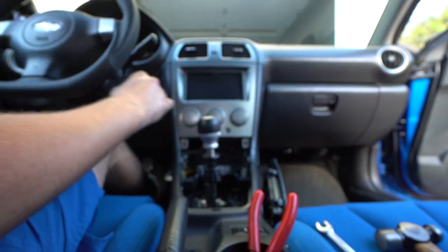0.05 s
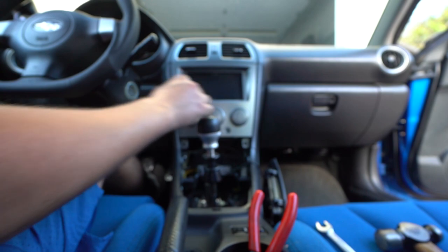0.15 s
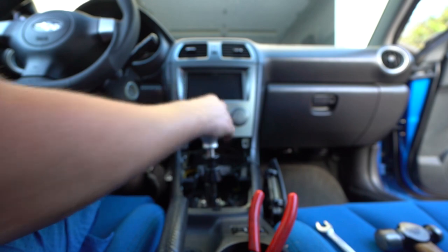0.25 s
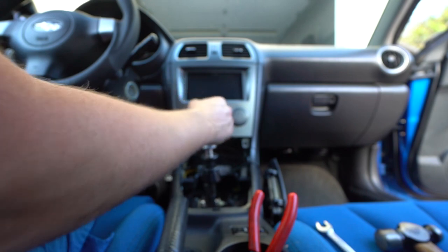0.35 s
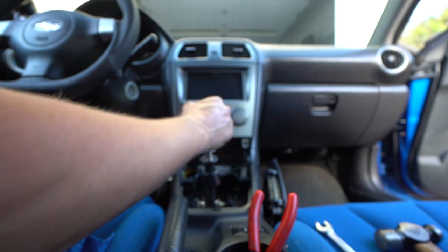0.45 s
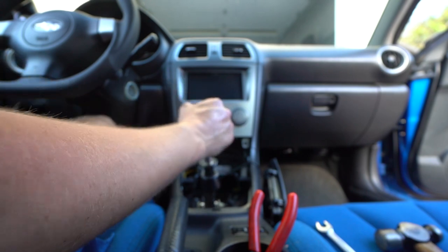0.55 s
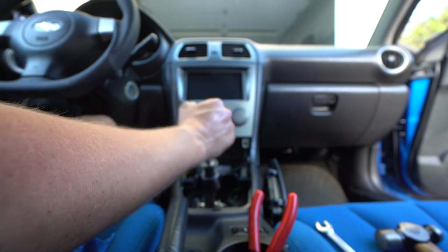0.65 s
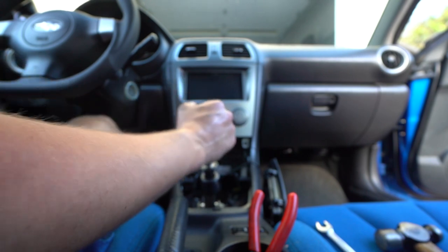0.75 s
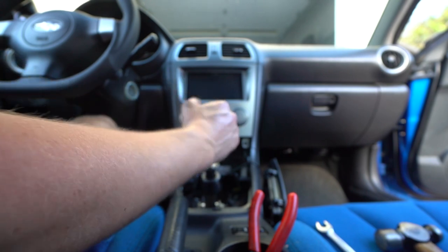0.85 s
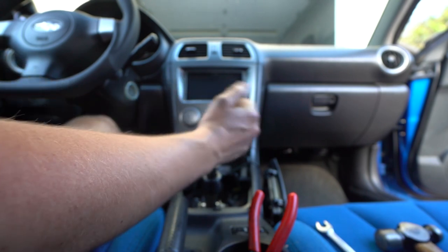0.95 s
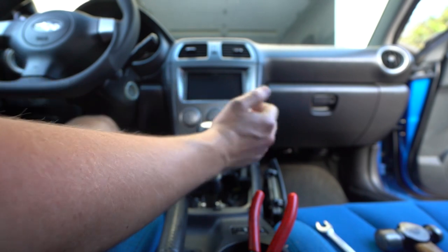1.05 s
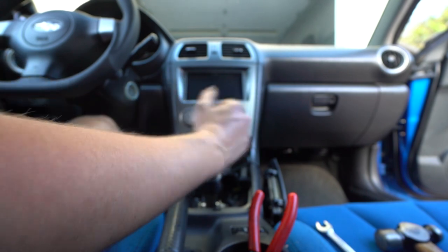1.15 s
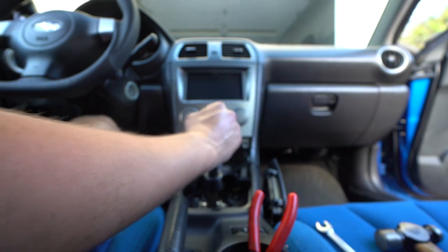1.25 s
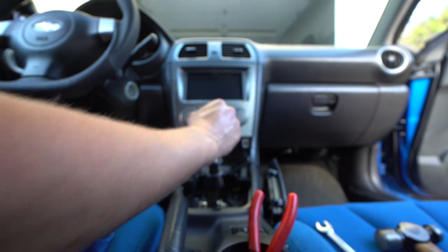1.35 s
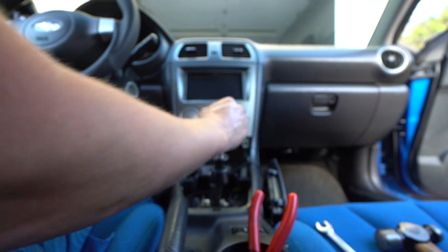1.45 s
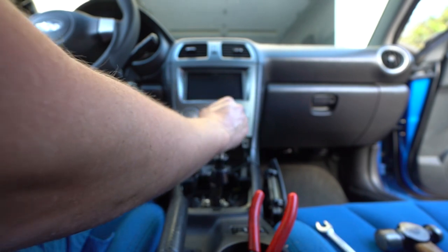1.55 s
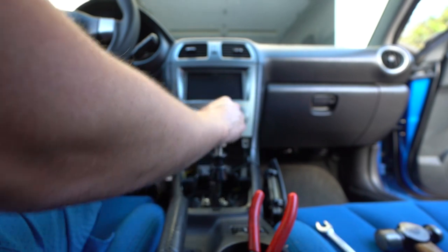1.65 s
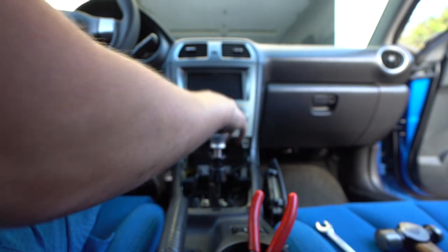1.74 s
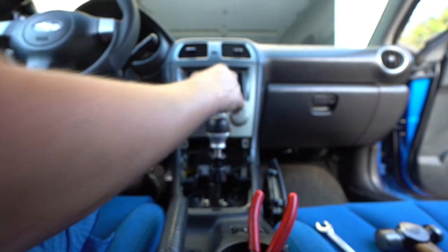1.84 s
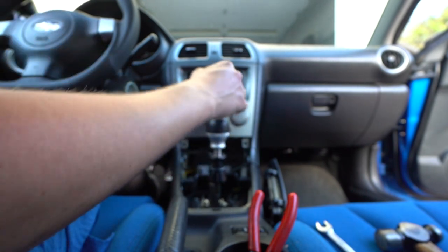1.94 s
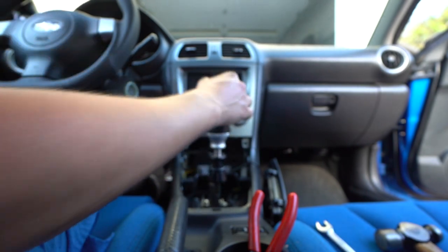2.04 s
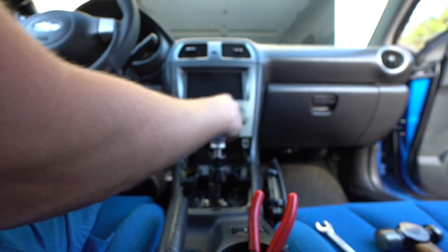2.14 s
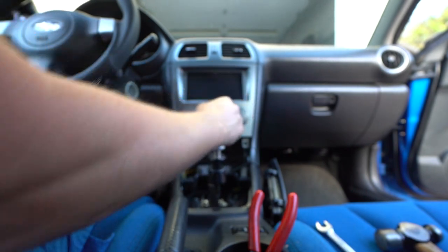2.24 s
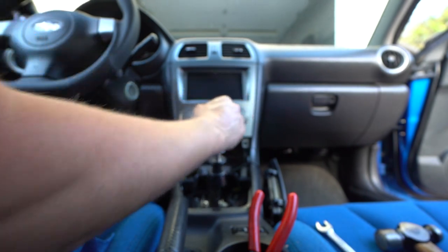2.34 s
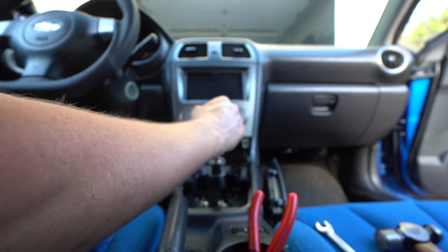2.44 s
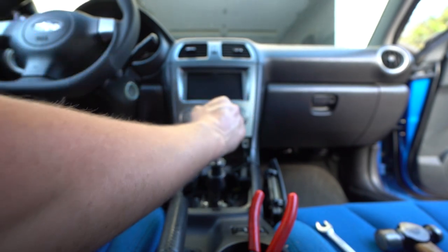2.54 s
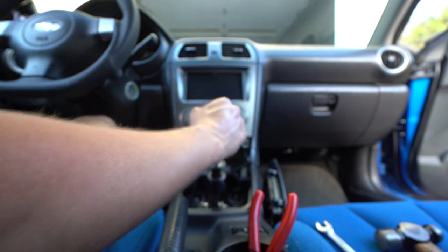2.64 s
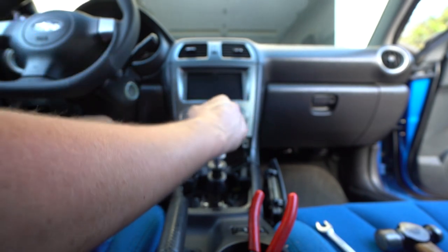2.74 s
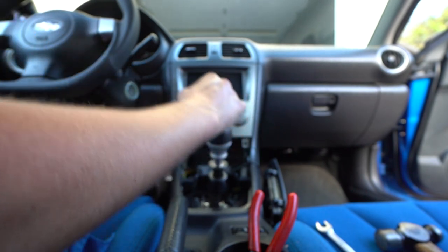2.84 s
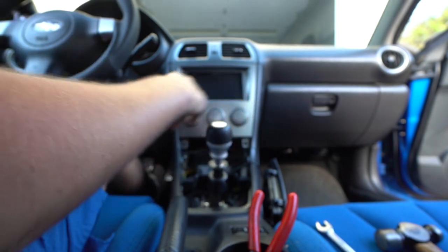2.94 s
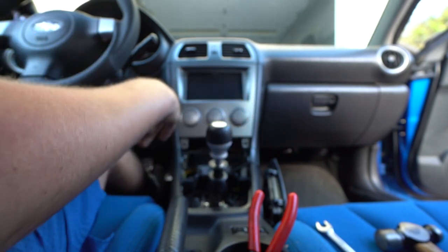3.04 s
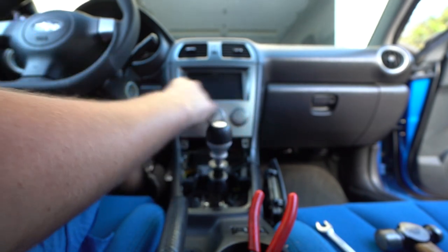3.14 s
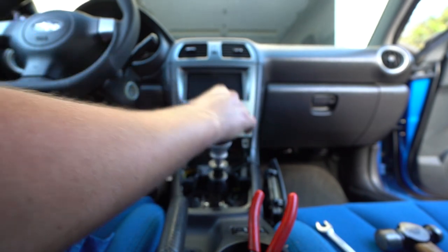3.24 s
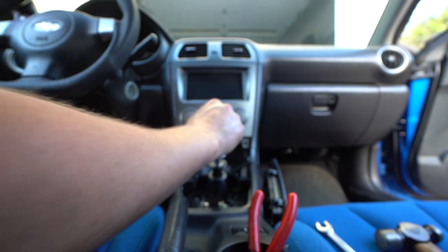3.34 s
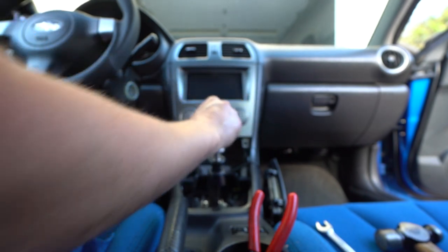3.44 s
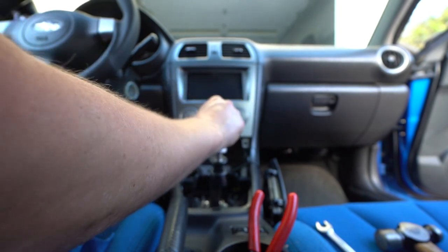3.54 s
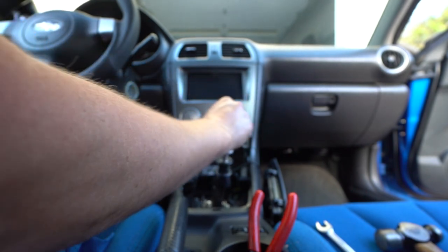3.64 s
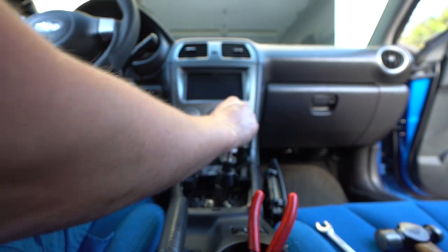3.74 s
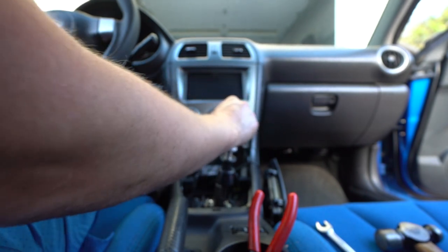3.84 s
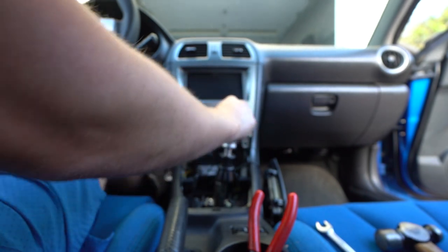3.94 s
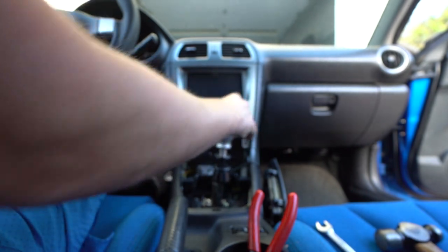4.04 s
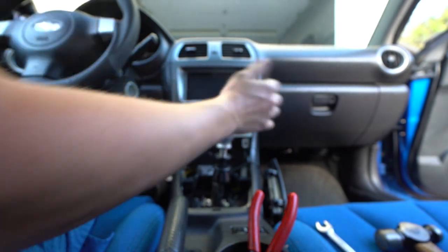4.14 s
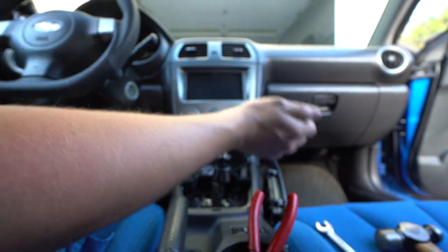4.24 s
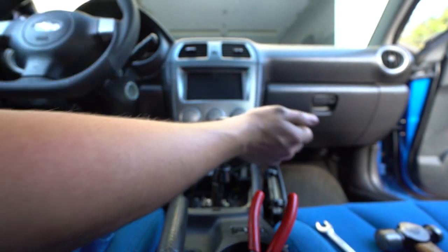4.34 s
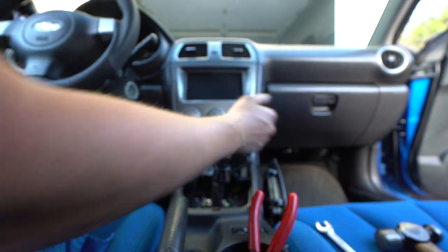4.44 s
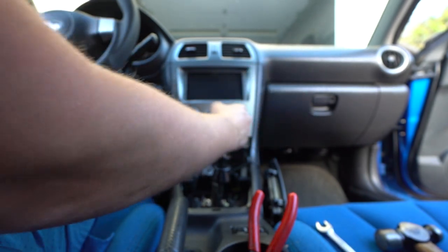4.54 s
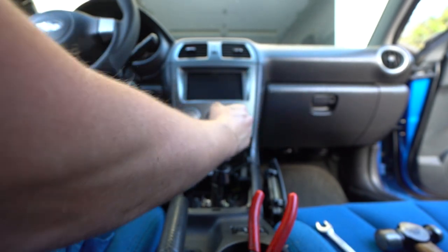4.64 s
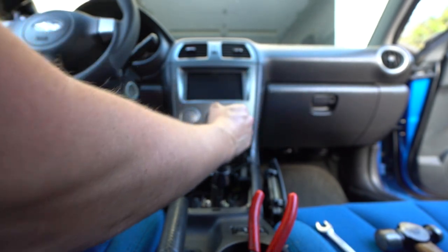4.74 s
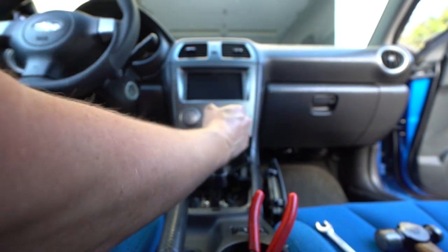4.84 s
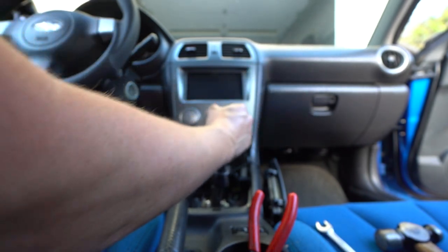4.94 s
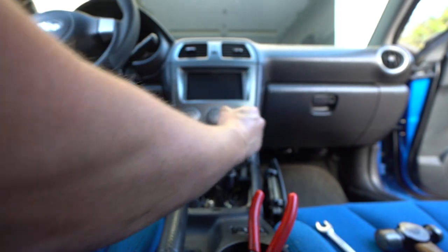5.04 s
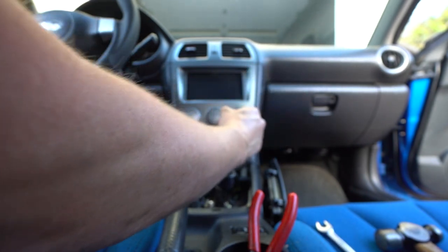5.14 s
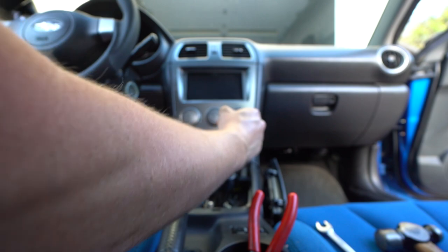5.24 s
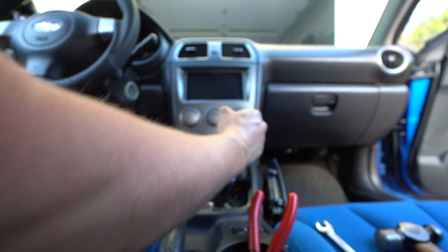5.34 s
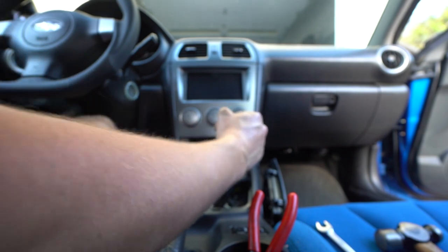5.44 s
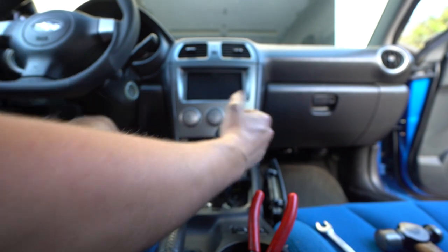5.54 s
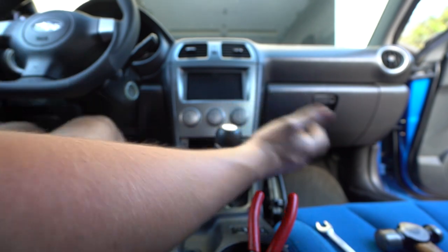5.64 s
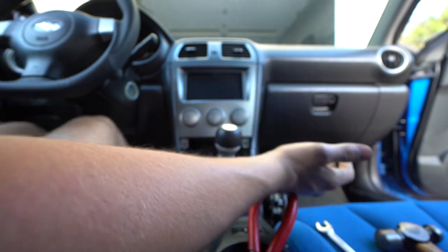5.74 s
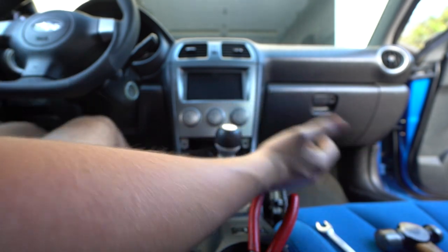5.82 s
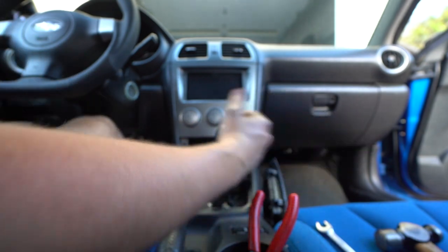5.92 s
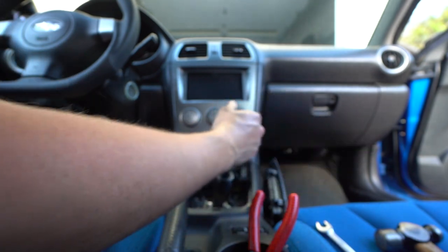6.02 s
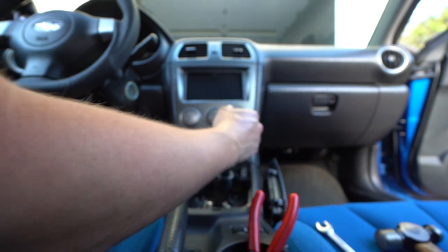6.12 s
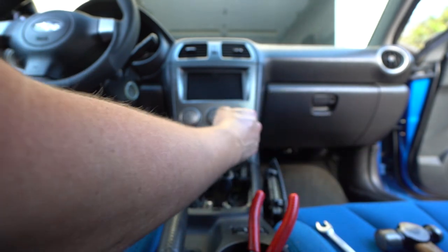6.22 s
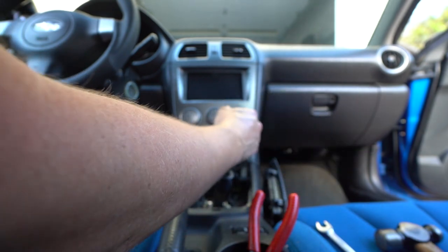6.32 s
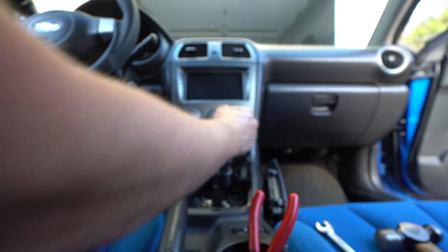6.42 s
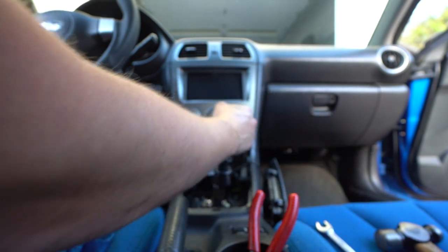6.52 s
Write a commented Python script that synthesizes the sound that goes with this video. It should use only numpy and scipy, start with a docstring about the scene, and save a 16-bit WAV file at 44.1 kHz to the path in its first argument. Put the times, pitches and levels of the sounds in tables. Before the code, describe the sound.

A gear shifter is worked back and forth for several seconds, heard from between the seats in a dry, tight cabin. Quick double clunks of the linkage alternate with short pauses; some are dull and woody, others bright and clanky. Skin rubs softly on the knob, the palm cracks against it, and little rattles trail the harder shifts over low body rumble and a quiet hush.

```python
"""A bare gear lever is worked through its gates in a parked car, engine off, heard from between the seats.
It knocks over its detent and the linkage clunks home: damped sines and banded chatter noise.
Steel parts ring in clusters of close modes; the palm slaps and rubs the knob as shaped noise.
Clunks boom in the cabin, throws rock the body and a small loose part taps, over a faint hush and hum."""
import sys
import numpy as np
from scipy import signal
from scipy.fft import rfft, irfft
from scipy.io import wavfile
from scipy.ndimage import uniform_filter1d

SR = 44100
rng = np.random.default_rng(int(sys.argv[2]) if len(sys.argv) > 2 else 0)


def pcm_store(signal):
    """Save signal as 16-bit PCM."""
    levels = np.round(np.clip(np.atleast_2d(signal), -1, 1) * 32767)
    wavfile.write(sys.argv[1], SR, levels.astype(np.int16).T)


N = 290178
TIME = np.arange(N) / SR


def from_db(db):
    """Decibels to amplitude gain."""
    return 10 ** (np.asarray(db) / 20)


def rms_one(x):
    """Scale to unit rms."""
    return x / np.sqrt(np.mean(x ** 2) + 1e-20)


def at_hz(points, hz):
    """Read a spectrum in dB on a log-frequency axis."""
    points = np.array(points)
    return np.interp(np.log(hz), np.log(points[:, 0]), points[:, 1])


def add(track, s, sound):
    """Mix a sound into a track at time s."""
    start = int(np.clip(round(s * SR), 0, N - 1))
    track[start:start + len(sound)] += sound[:N - start]


def band(x, low_hz, high_hz):
    """Butterworth band-pass."""
    edges_hz = [low_hz, min(high_hz, 0.45 * SR)]
    return signal.sosfilt(signal.butter(2, edges_hz, "band", fs=SR, output="sos"), x)


def coloured(spectrum):
    """Steady noise with a given spectrum, rms 1."""
    hz = np.maximum(np.fft.rfftfreq(N, 1 / SR), 1)
    white = rfft(rng.standard_normal(N))
    return rms_one(irfft(white * from_db(at_hz(spectrum, hz)), N))


def evened(x, span_s):
    """Hold the rms near 1 over a short span, keeping the finer grain."""
    power = np.abs(uniform_filter1d(x ** 2, int(span_s * SR) + 1))
    return x / np.sqrt(power + 1e-12)


def ping(hz, t60, rise_s):
    """A damped sine that builds up over rise_s and falls 60 dB in t60 seconds."""
    t = TIME[:int(t60 * SR) + 64]
    return np.sin(2 * np.pi * hz * t) * from_db(-60 * t / t60) * (1 - np.exp(-t / rise_s))


def burst(rise_s, hold_s, t60, size=SR // 2):
    """Envelope of a contact: quick rise, short hold, exponential decay."""
    t = TIME[:size]
    return (1 - np.exp(-t / rise_s)) * from_db(-60 * np.maximum(t - hold_s, 0) / t60)


# Still air in the cabin. Each row: frequency in Hz, relative level in dB per Hz.
AIR_SPECTRUM = [(30, -6.5), (50, -1.5), (87, -14.5), (125, -3.5), (167, -11), (284, -14.5), (340, -15),
                (480, -19), (640, -13.5), (905, -21.5), (1150, -20), (1450, -25.5), (1960, -30),
                (3030, -33), (5000, -38.5), (8000, -43), (16000, -45)]
# Course of the hush. Each row: time in seconds, relative level in dB.
HUSH_COURSE = [(0, 2), (1.2, 0), (2.0, -1.2), (4.4, -0.8), (6.5, -1)]
AIR_DB = -35   # before the course and level_db
HUM_HZ, HUM_DB = 119.4, -43


def air(level_db):
    """The hush and hum of the world outside: shaped noise that eases off a little, and a steady sine."""
    s, course_db = np.transpose(HUSH_COURSE)
    hush_db = AIR_DB + level_db + np.interp(TIME, s, course_db)
    hum = from_db(HUM_DB) * np.sin(2 * np.pi * HUM_HZ * TIME)
    return from_db(hush_db) * coloured(AIR_SPECTRUM) + hum


# Throws that shove the car body. Each row: start in seconds, relative sway in dB, relative rumble in dB.
BODY_SHOVES = [(0.0, -23, -29), (0.55, -9.5, -15), (0.77, -18.5, -25), (1.419, -11.5, -12.5),
               (1.72, -17, -13), (2.42, -12.5, -14), (2.74, -16, -25), (3.5, -11, -12), (3.97, -16, -13.5),
               (4.14, -17, -23), (4.85, -14.5, -12), (5.1, -11, -20.5), (5.44, -6.5, -15.5),
               (6.04, -15.5, -17), (6.49, -18.5, -19)]
SHOVE_RISE_S, SHOVE_HOLD_S = 0.02, 0.14
SWAY_T60_S, RUMBLE_T60_S = 1.91, 0.59
IDLE_SWAY_DB, IDLE_RUMBLE_DB = -23, -33   # the body never quite settles


def rocking(sway_hz, sway_db, rumble_db):
    """Each shove swells a sway of wandering rate and a rougher, higher rumble that dies sooner."""
    sway_power = np.full(N, from_db(IDLE_SWAY_DB) ** 2)
    rumble_power = np.full(N, from_db(IDLE_RUMBLE_DB) ** 2)
    sway_shape = burst(SHOVE_RISE_S, SHOVE_HOLD_S, SWAY_T60_S, size=2 * SR)
    rumble_shape = burst(SHOVE_RISE_S, SHOVE_HOLD_S, RUMBLE_T60_S, size=SR)
    for s, swing_db, shake_db in BODY_SHOVES:
        add(sway_power, s, (from_db(swing_db + sway_db) * sway_shape) ** 2)
        add(rumble_power, s, (from_db(shake_db + rumble_db) * rumble_shape) ** 2)
    rate_hz = sway_hz * (1 + 0.32 * rms_one(band(rng.standard_normal(N), 2.3, 33.4)))
    sway = np.sin(2 * np.pi * np.cumsum(rate_hz) / SR)
    rumble = evened(band(rng.standard_normal(N), 20.2, 51.7), span_s=0.07)
    return np.sqrt(sway_power) * sway + np.sqrt(rumble_power) * rumble


# Skin sliding over the knob. Each row: middle in seconds, relative level in dB,
# time from the middle to exp(-2) of the swell in seconds, spectral peak in Hz.
HAND_RUBS = [(0.356, -38, 0.016, 4900), (0.415, -43, .027, 5560), (0.476, -42, 0.012, 4000),
             (1.792, -45, .048, 10000), (2.432, -44, .03, 9000), (2.845, -37.5, .031, 6940),
             (2.976, -46, .06, 4800), (3.359, -39, 0.07, 4070), (3.446, -43.5, 0.041, 5500),
             (4.098, -41.5, 0.027, 10000), (4.66, -44, .01, 6900), (4.735, -45, .011, 5000),
             (4.813, -45, .012, 5000), (5.232, -43.5, 0.014, 2980), (5.413, -46, .014, 11000),
             (5.602, -43, .017, 8000)]


def rubs(level_db, slope_db, grain_db):
    """Each slide of the hand is a soft swell of grainy hiss, changing by slope_db per octave off its peak."""
    out, size = np.zeros(N), SR // 4
    hz = np.maximum(np.fft.rfftfreq(size, 1 / SR), 1)
    t = TIME[:size] - TIME[size // 2]
    for s, db, length_s, bright_hz in HAND_RUBS:
        grain = rms_one(band(rng.standard_normal(size), 30, 600))
        friction = rng.standard_normal(size) * from_db(grain_db * grain)
        tilt = from_db(slope_db * np.abs(np.log2(hz / bright_hz)))
        hiss = rms_one(irfft(rfft(friction) * tilt, size))
        add(out, s + t[0], from_db(level_db + db) * hiss * np.exp(-2 * (t / length_s) ** 2))
    return out


def chatter(per_s, spread_db, smooth):
    """Dense uneven micro-contacts, blurred by nearby reflections, plus some smooth noise."""
    hits = rng.random(N) < per_s / SR
    clicks = hits * rng.choice([-1, 1], N) * from_db(spread_db * rng.standard_normal(N))
    t = TIME[:SR // 40]
    # paths through the linkage scatter each contact over a few milliseconds
    scatter = rng.standard_normal(len(t)) * from_db(-60 * t / 0.019)
    return rms_one(signal.fftconvolve(clicks, scatter)[:N]) + smooth * rng.standard_normal(N)


# Resonances of the console's panels and brackets.
# Each row: frequency in Hz, width in Hz, gain of the resonance in dB.
CONSOLE_MODES = [(195.6, 4.8, -2.5), (283, 32, -6.5), (480, 31, -23), (606, 50, -8), (779, 40, -2),
                 (940, 11, -13), (1067, 92, 10.5), (1194, 18, 8.5), (1324, 26, -1), (1404, 88, 5),
                 (1640, 31, -8), (1755, 14, -2), (1742, 23, -0.5), (1866, 41, 8), (2030, 25, 5.5),
                 (2283, 43, 8.5), (2380, 25, 6.5), (2717, 38, 2.5), (2760, 17, -4), (3070, 17, -13),
                 (3340, 73, 2.5), (3552, 73, 9), (3700, 98, 2), (4443, 72, 10.5), (4550, 40, 4),
                 (5350, 140, 6.5), (6030, 100, 10)]


def console(x, direct):
    """The console's panels and brackets resonate in parallel with the direct shake."""
    out = direct * x
    for hz, width_hz, db in CONSOLE_MODES:
        b, a = signal.iirpeak(hz, hz / width_hz, fs=SR)
        out = out + from_db(db) * signal.lfilter(b, a, x)
    return out


# Linkage going home. Each row: start in seconds, then relative levels in dB of clunk (750 Hz),
# thud (170 Hz), clank (2400 Hz) and edge (5400 Hz), and chatter hold in seconds.
LINKAGE_CLUNKS = [(0.421, -18.5, -21, -38, -51, 0.052), (0.542, -8, -13.5, -15, -40, 0.017),
                  (0.762, -12.5, -17, -24.5, -40, 0.029), (1.279, -11.5, -21, -47, -45, 0.03),
                  (1.449, -2.5, -18.5, -17.5, -32, 0.0079), (1.461, -8, -15.5, -15.5, -28, 0.016),
                  (1.476, -17.5, -21, -20, -27.5, 0.02), (1.673, -6.5, -18, -25, -44, 0.025),
                  (1.728, 1, -12.5, -22.5, -25.5, 0.0088), (1.747, -11.5, -19, -18.5, -26.5, 0.015),
                  (1.804, -19, -19, -29, -53, 0.0027), (2.291, -18, -21, -33, -48, .014),
                  (2.41, -4, -14.5, -21.5, -48, 0.01), (2.423, -3.5, -15.5, -15.5, -35, 0.005),
                  (2.718, -11, -19.5, -21.5, -39.5, 0.026), (3.432, -23.5, -21, -38, -50, 0.036),
                  (3.502, -2, -13.5, -16, -59, 0.018), (3.514, -20, -13, -17.5, -32, 0.0036),
                  (3.546, -12.5, -15.5, -21, -41, 0.0048), (3.7005, -11.5, -32, -32.5, -52, .004),
                  (3.769, -18, -35, -40, -46, 0.0046), (3.802, -19.5, -21.5, -43, -57, 0.0026),
                  (3.959, -5.5, -12, -21, -31, 0.014), (3.996, -6, -10, -12, -35, 0.0054),
                  (4.017, -7, -20.5, -19.5, -26.5, 0.02), (4.094, -18, -16, -32, -39, 0.0094),
                  (4.679, -25, -17.5, -31.5, -48, 0.0074), (4.833, -3.5, -15, -18, -45, 0.0042),
                  (4.846, -3.5, -11.5, -17, -33, .007), (5.104, -9.5, -30, -34, -37, 0.004),
                  (5.404, -16, -31, -33, -49, 0.021), (5.424, -7.5, -17.5, -20, -35.5, 0.021),
                  (5.477, -7.5, -15, -18.5, -39, 0.029), (5.83, -15, -29, -47, -33.5, 0.0081),
                  (6.047, -14.5, -18.5, -40, -53, 0.034), (6.49, 0.5, -12, -20, -43, 0.025),
                  (6.502, -8, -28, -22.5, -40, 0.0036), (6.541, -6.5, -21, -30, -34, 0.0092)]
CLUNK_T60_S = 0.25   # heavy blow, at 1 kHz
HEAVY_THUD_DB, LONGER_PER_DB = -19, 0.02   # rise of the log of t60 per dB of thud below heavy
CHOKE_GAPS = 6.3   # t60 at most this many times the gap to the next contact


def clunk_decays():
    """The t60 of each clunk: light blows ring slightly longer, and a quick next contact chokes the ring."""
    s, _, thud_db, *_ = np.transpose(LINKAGE_CLUNKS)
    free_s = CLUNK_T60_S * np.exp(LONGER_PER_DB * np.maximum(HEAVY_THUD_DB - thud_db, 0))
    return np.minimum(free_s, CHOKE_GAPS * np.diff(s, append=np.inf))


# The linkage's own spectrum. Each row: frequency in Hz, relative level in dB per Hz.
LINKAGE_SPECTRUM = [(100, -2), (159, -10.5), (240, -15), (345, -11.5), (688, -19), (1160, -18.5),
                    (1500, -22.5), (1900, -24), (2750, -27), (3110, -30), (3550, -29.5), (4100, -33.5),
                    (6300, -46.5), (8000, -69), (15000, -68)]


def clunks(thud_db, clunk_db, clank_db, edge_db, rise_s, tail_db, tail_t60, bass_hang):
    """Steel faces chatter together for a moment; the cabin carries a fainter, longer tail."""
    shakes = [console(chatter(per_s=900, spread_db=3.5, smooth=0.4), direct=0.95) for _ in range(2)]
    edges_hz = np.geomspace(100, 16000, 19)
    zones_hz = np.array([170, 750, 2400, 5400])
    tail = from_db(tail_db) * burst(0.096, 0, tail_t60)
    decays_s = clunk_decays()
    out = np.zeros(N)
    for k, (low, high) in enumerate(zip(edges_hz, edges_hz[1:])):
        hz, power = np.sqrt(low * high), np.zeros(N)
        slow = (1000 / hz) ** bass_hang   # lows build later and last longer
        for (s, clunk, thud, clank, edge, hold_s), t60 in zip(LINKAGE_CLUNKS, decays_s):
            # the blow's level in each zone bends the linkage's own spectrum
            zone_db = np.array([thud + thud_db, clunk + clunk_db, clank + clank_db, edge + edge_db])
            bend_db = zone_db - at_hz(LINKAGE_SPECTRUM, zones_hz) - 10 * np.log10(zones_hz)
            own_db = at_hz(LINKAGE_SPECTRUM, hz) + 10 * np.log10(hz)
            db = own_db + np.interp(np.log(hz), np.log(zones_hz), bend_db)
            contact = burst(rise_s * slow, hold_s, t60 * slow)
            add(power, s, from_db(db) ** 2 * (contact ** 2 + tail ** 2))
        # neighbouring bands use different chatter
        out += np.sqrt(power) * evened(band(shakes[k % 2], low, high), span_s=0.032)
    return out


# Cabin and body modes. Each row: centre frequency in Hz, relative level in dB, t60 in seconds.
CABIN_MODES = [(31.48, -1.5, 1), (40.7, -41, 0.3), (80.4, 2, 0.23), (90.7, 3, 0.3), (147, -0.5, 0.067),
               (196.4, -1, 0.15), (287.5, -5, 0.21)]


def boom(level_db, lag_s, rise_s):
    """The thud of every clunk sets the cabin's low modes ringing, slightly detuned each time."""
    out = np.zeros(N)
    for s, _, thud_db, *_ in LINKAGE_CLUNKS:
        for hz, db, t60 in CABIN_MODES:
            mode_hz = hz * (1 + 0.022 * rng.standard_normal())
            add(out, s + lag_s, from_db(level_db + thud_db + db) * ping(mode_hz, t60, rise_s))
    return out


# Lever knocking over the detent. Each row: start in seconds, relative level in dB, pitch in Hz.
DETENT_KNOCKS = [(0.548, -5.5, 705), (1.681, -6.5, 640), (1.7322, 3, 646), (1.8125, -9, 644),
                 (2.331, -17, 640), (2.415, -10, 736), (2.424, -4.5, 760), (2.726, -10.5, 430),
                 (3.523, -6, 520), (3.799, -19.5, 830), (4.0007, 2, 660), (4.6808, -6.5, 510),
                 (4.693, -10.5, 690), (5.4257, -13, 1210), (5.438, -11, 1110), (5.490, -15, 945),
                 (6.492, -7, 1050)]
# Lever sticking and slipping on the detent's ramp. Each row: start in seconds, relative level in dB,
# centre pitch in Hz, time between slips in seconds, number of slips.
RAMP_JUDDERS = [(0.436, -16.5, 620, 0.0084, 2), (0.4578, -4.5, 502, 0.0064, 4),
                (2.292, -10.5, 530, .009, 3), (5.84, -17.5, 980, 0.0074, 2)]
KNOCK_T60_S = 0.016
SLIP_DETUNE = 0.098   # pitch scatter from slip to slip, as a share


def knocks(level_db, rise_s):
    """Short hollow knocks of a few cycles: single, or in a quick run of slips."""
    out, hits = np.zeros(N), list(DETENT_KNOCKS)
    for s, db, hz, gap_s, slips in RAMP_JUDDERS:
        for k in range(round(slips)):
            hits.append((s + k * gap_s, db, hz * (1 + SLIP_DETUNE * rng.standard_normal())))
    for s, db, hz in hits:
        add(out, s, from_db(level_db + db) * ping(hz, KNOCK_T60_S, rise_s))
    return out


# Steel parts set ringing. Each row: start in seconds, relative level in dB, centre pitch in Hz,
# spread of the close modes to either side in Hz, t60 in seconds.
STEEL_RINGS = [(0.470, -26, 2370, 300, 0.068), (0.549, -9, 1733, 140, .066), (0.556, -13, 2120, 168, 0.23),
               (0.558, -21.5, 2520, 259, 0.22), (0.765, -17.5, 3504, 224, 0.21),
               (0.770, -20, 2140, 29.8, .18), (1.284, -12.5, 1267, 231, 0.039),
               (1.457, -16.5, 2090, 128, 0.28), (1.678, -13, 1910, 53, .045), (1.73, -3.5, 1890, 180, 0.02),
               (3.517, -23, 8270, 500, .027), (3.702, -27, 2900, 220, 0.019), (3.7668, -23, 2830, 85, .03),
               (3.767, -26, 3500, 150, .025), (4.000, -5, 1920, 378, 0.044), (4.223, -18, 1790, 259, 0.027),
               (4.833, -11, 2820, 130, .037), (4.834, -17.5, 4270, 180, .049),
               (4.847, -2, 2680, 450, 0.018), (4.847, -3.5, 6950, 870, 0.0077),
               (5.108, -16.5, 2766, 132, 0.057), (5.109, -26.5, 3620, 130, 0.045),
               (5.4245, -15, 2930, 730, 0.0395), (6.067, -13.5, 1215, 300, 0.04),
               (6.4942, -4, 1856, 127, .077), (6.493, -16.5, 3620, 92, .042),
               (6.506, -10.5, 8000, 137, .017)]


def rings(level_db, rise_s, scatter, count):
    """Rods and springs ring in clusters of close modes, struck a moment apart, that beat roughly."""
    out = np.zeros(N)
    for s, db, hz, spread_hz, t60 in STEEL_RINGS:
        places = np.linspace(-1, 1, count) + rng.uniform(-1.15, 1, count) / count
        lags_s = scatter * min(t60, 0.25) * rng.random(count) ** 2   # freer parts keep jangling longer
        cluster = np.zeros(N)
        for place, lag_s in zip(places, lags_s):
            add(cluster, lag_s, ping(hz + spread_hz * place, t60, rise_s))
        # the modes share the energy of one ping
        share = np.sqrt(np.sum(ping(hz, t60, rise_s) ** 2) / np.sum(cluster ** 2))
        add(out, s, from_db(level_db + db) * share * cluster)
    return out


# Spectrum of slaps and snaps. Each row: frequency in Hz, relative level in dB per Hz.
SLAP_SPECTRUM = [(500, -14), (800, 14), (1520, 3.5), (2730, 4), (4000, 5), (5400, 4), (7500, -0.5),
                 (9500, -3.5), (11000, -4), (16000, -12)]
# Palm slaps and sharp snaps. Each row: start in seconds, relative body level in dB,
# relative top level in dB, contact hold in seconds.
HAND_SNAPS = [(0.548, -12, -26, .002), (0.948, -26, -38.5, 0.012), (1.259, -10.5, -28, 0.0012),
              (1.2609, -18, -15.5, .0025), (1.448, -16, -31, 0.0018), (1.459, -27, -22, .002),
              (2.41, -18.5, -36, 0.0032), (3.504, -24, -29, 0.0022), (3.518, -15, -30, .003),
              (3.996, -29, -30.5, .004), (4.601, -25, -33, 0.0051), (4.835, -20, -23, 0.0012),
              (4.846, -6, -18, .0005), (5.573, -21.5, -35, .005), (5.5896, -12.5, -23, 0.0012),
              (6.0239, -5, -18, .0035), (6.493, -7.5, -31, 0.0033), (6.504, -19, -26, 0.0025)]
SNAP_T60_S = 0.035


def snaps(body_db, top_db, split_hz, rise_s, tail_db, tail_t60):
    """Bright cracks of noise in two bands that die within milliseconds, with a faint cabin tail."""
    body, top = np.zeros(N), np.zeros(N)
    tail = from_db(tail_db) * burst(0.005, 0, tail_t60)
    for s, db, high_db, hold_s in HAND_SNAPS:
        shape = burst(rise_s, hold_s, SNAP_T60_S) + tail
        add(body, s, from_db(db + body_db) * shape)
        add(top, s, from_db(high_db + top_db) * shape)
    crack = evened(band(coloured(SLAP_SPECTRUM), 470, split_hz), span_s=0.0046)
    sizzle = evened(band(coloured(SLAP_SPECTRUM), split_hz, SR / 2), span_s=0.004)
    return body * crack + top * sizzle


# Runs of taps of the loose part as the body shakes.
# Each row: start in seconds, relative level of the first tap in dB, number of taps.
TAP_RUNS = [(0.611, -8, 3), (0.822, -13.5, 2), (1.282, -9, 1), (1.344, -15.5, 1), (1.499, -9.5, 3),
            (1.66, -16, 1), (1.78, -6, 3), (1.882, -21, 1), (2.481, -6, 4), (2.697, -18, 1),
            (2.786, -15, 1), (3.385, -19, 1), (3.476, -19, 1), (3.558, -6.5, 4), (4.166, -14, 2),
            (4.908, -10, 3), (5.538, -9.5, 2), (6.055, -11, 1), (6.098, -11.5, 3)]
TAP_GAP_S, TAP_SLOWING_S = 0.0265, 0.000514   # slowing: times the square of the taps gone by
TAP_FADE_DB = 1.5   # loss, times the square of the taps gone by


def taps():
    """The taps of every run as (s, dB): they slow a little and fade ever faster as the shaking dies."""
    return [(s + k * TAP_GAP_S + k * k * TAP_SLOWING_S, db - k * k * TAP_FADE_DB)
            for s, db, count in TAP_RUNS for k in range(round(count))]


def rattle(level_db, pitch_hz, swell_s, overtone_hz, overtone_db):
    """Each soft tap of the loose part swells and dies within a few cycles, its pitch a little scattered."""
    out, t = np.zeros(N), TIME[:SR // 40]
    swell = (t / swell_s) ** 2 * np.exp(2 - 2 * t / swell_s)
    for s, db in taps():
        turn = 2 * np.pi * t * (1 + 0.04 * rng.standard_normal())
        tone = np.sin(pitch_hz * turn) + from_db(overtone_db) * np.sin(overtone_hz * turn)
        add(out, s, from_db(level_db + db) * swell * tone)
    return out


def spring(s, hz, level_db, t60):
    """After one hard clunk the return spring sings on, two close modes beating."""
    out = np.zeros(N)
    modes = ping(hz, t60, 0.002) + 0.5 * ping(hz * 1.007, t60, 0.002)
    add(out, s, from_db(level_db) * modes)
    return out


def squeak(s, length_s, start_hz, end_hz, level_db):
    """The pivot gives one faint, falling squeak, its pitch jittered by noise."""
    out, t = np.zeros(N), TIME[:int(length_s * SR)]
    glide_hz = end_hz + (start_hz - end_hz) * (1 - t / length_s) ** 2
    hz = glide_hz + 230 * rms_one(band(rng.standard_normal(N), 100, 900))[-len(t):]
    tone = np.sin(2 * np.pi * np.cumsum(hz) / SR)
    add(out, s, from_db(level_db) * np.sin(np.pi * t / length_s) * tone)
    return out


def scene():
    """All sources, close by in the small cabin."""
    lever = clunks(thud_db=-10.5, clunk_db=-20.5, clank_db=-10.5, edge_db=-13.5,
                   rise_s=0.0011, tail_db=-17.5, tail_t60=0.55, bass_hang=0.29)
    lever += knocks(level_db=3.5, rise_s=0.0004)
    lever += rings(level_db=-3.5, rise_s=0.00046, scatter=0.06, count=13)
    lever += spring(s=1.73, hz=2100, level_db=-45.5, t60=1.6)
    lever += squeak(s=2.915, length_s=0.045, start_hz=3180, end_hz=3020, level_db=-40)
    hand = snaps(body_db=-13.5, top_db=-7.5, split_hz=5840, rise_s=0.0013, tail_db=-26.5, tail_t60=0.51)
    hand += rubs(level_db=-5, slope_db=-8, grain_db=3.5)
    car = boom(level_db=-1.0, lag_s=0.00396, rise_s=0.0035)
    car += rocking(sway_hz=15.5, sway_db=2.0, rumble_db=-0.5)
    car += rattle(level_db=-3, pitch_hz=856, swell_s=0.0013, overtone_hz=1980, overtone_db=-22)
    return (lever + hand + car + air(level_db=-1))[None]


CUTOFF_HZ = 16100


def record(dry):
    """The loudest peaks are rounded off and the top is cut steeply."""
    limited = dry / (1 + np.abs(dry) ** 6) ** (1 / 6)
    return signal.sosfilt(signal.ellip(10, 0.1, 90, CUTOFF_HZ, fs=SR, output="sos"), limited)


dry = scene()
out = record(dry)
pcm_store(out)
```